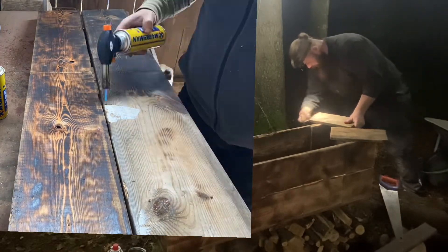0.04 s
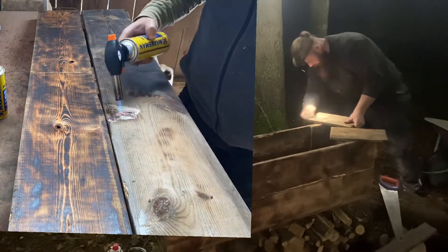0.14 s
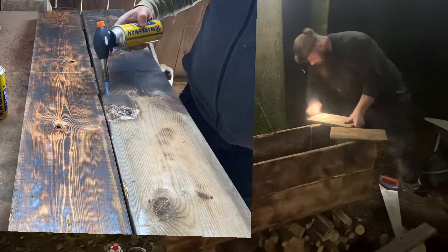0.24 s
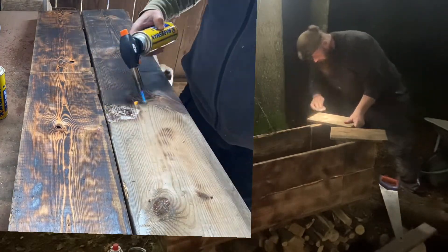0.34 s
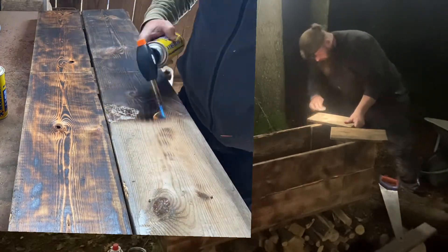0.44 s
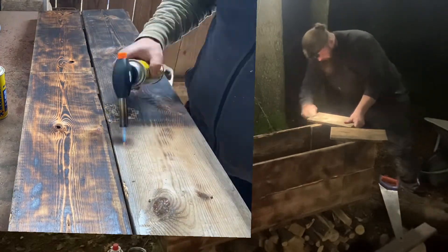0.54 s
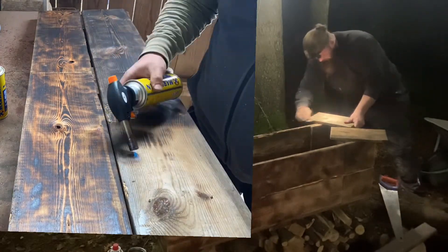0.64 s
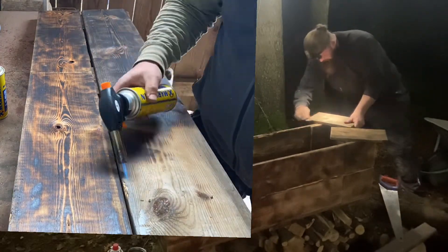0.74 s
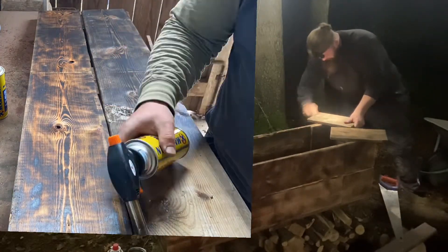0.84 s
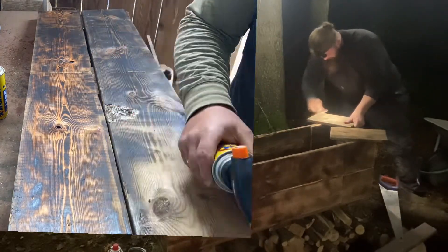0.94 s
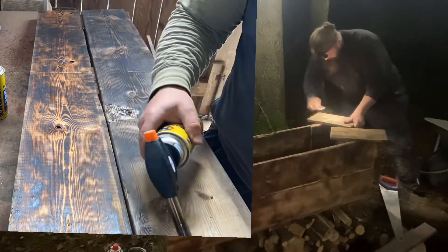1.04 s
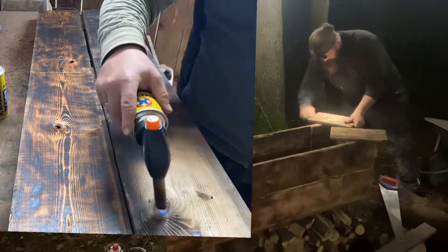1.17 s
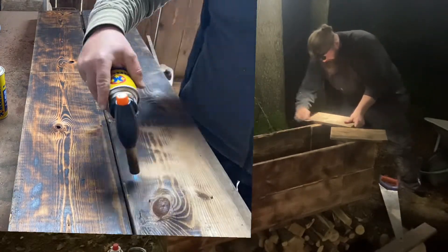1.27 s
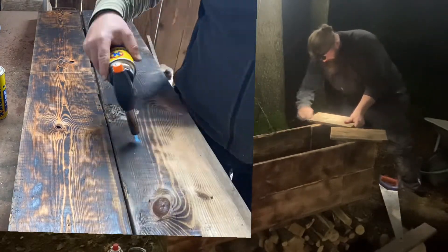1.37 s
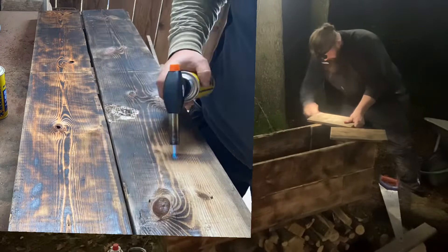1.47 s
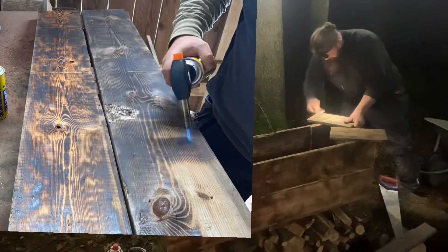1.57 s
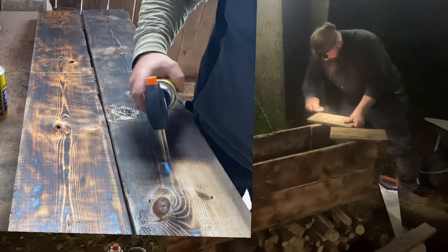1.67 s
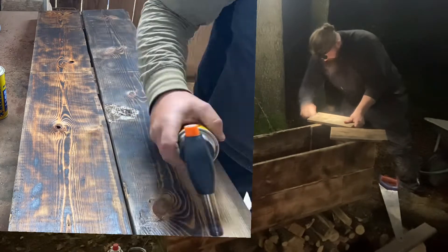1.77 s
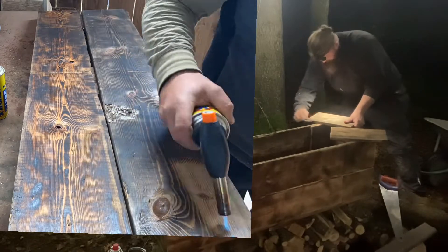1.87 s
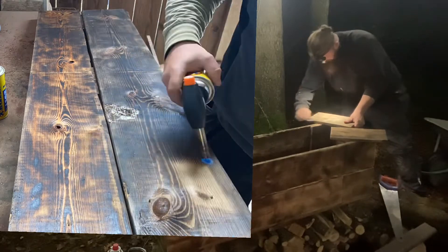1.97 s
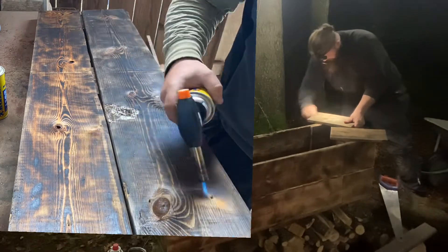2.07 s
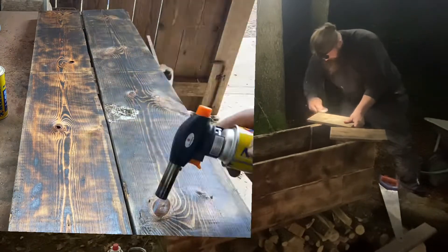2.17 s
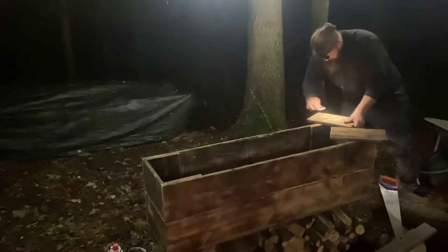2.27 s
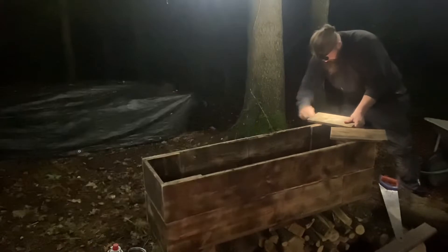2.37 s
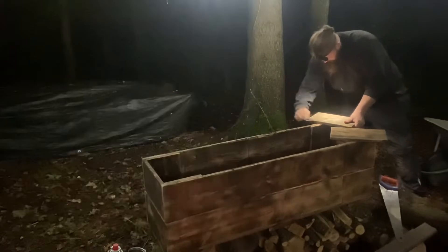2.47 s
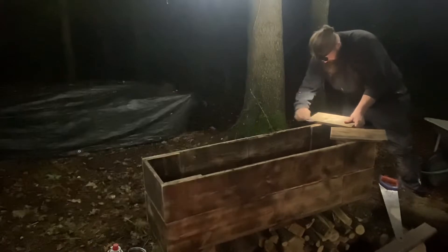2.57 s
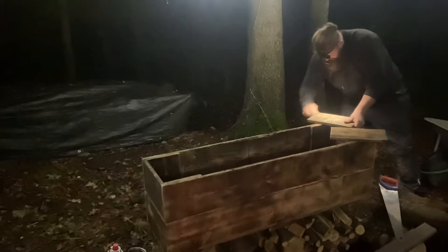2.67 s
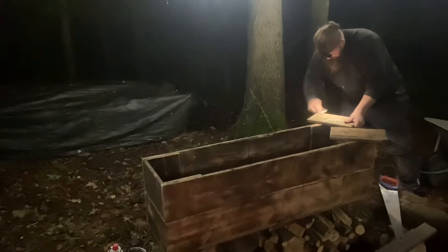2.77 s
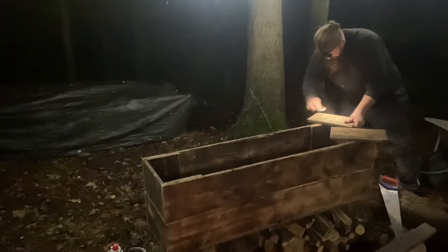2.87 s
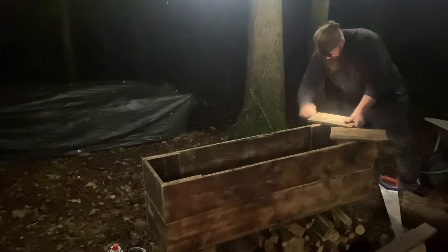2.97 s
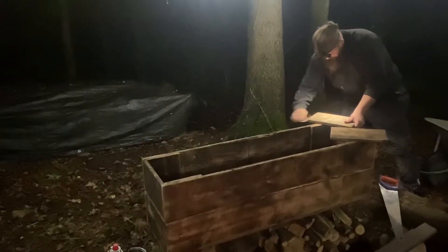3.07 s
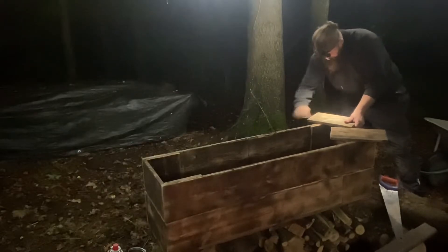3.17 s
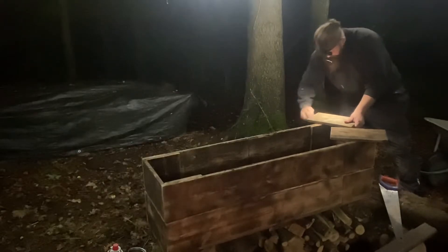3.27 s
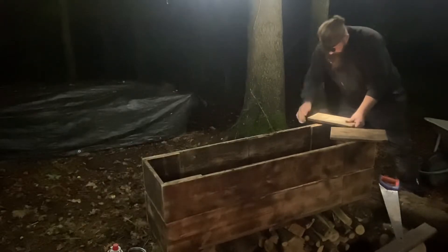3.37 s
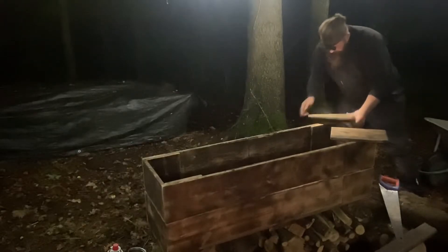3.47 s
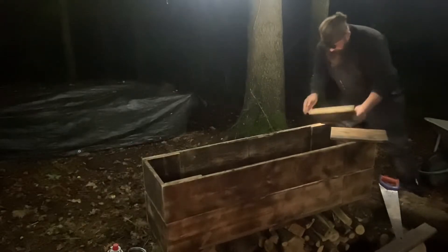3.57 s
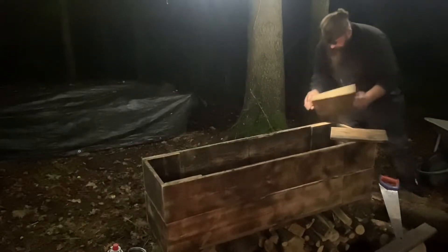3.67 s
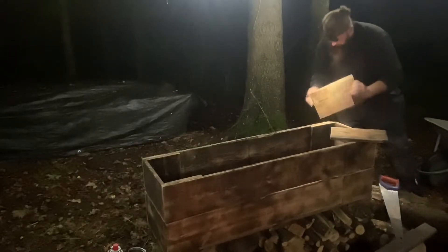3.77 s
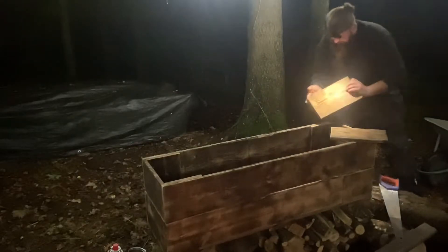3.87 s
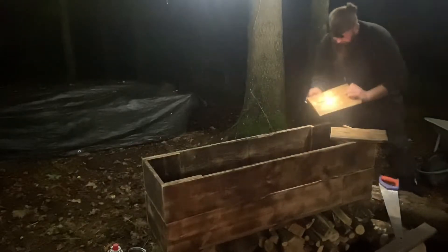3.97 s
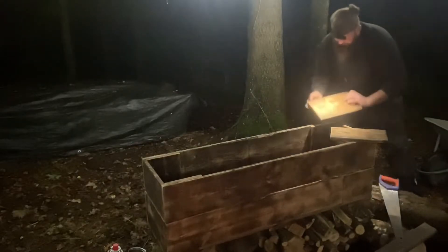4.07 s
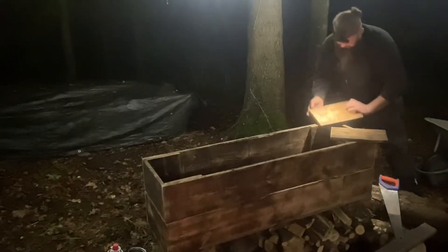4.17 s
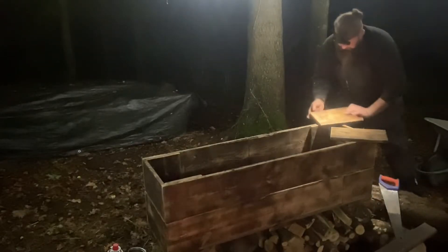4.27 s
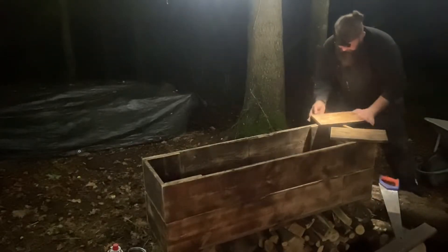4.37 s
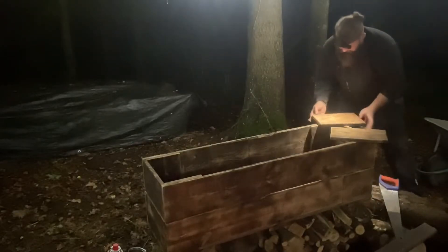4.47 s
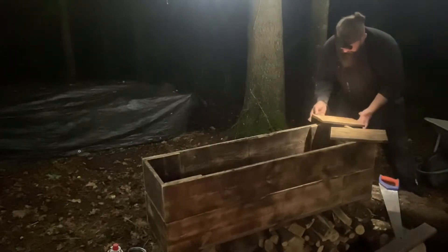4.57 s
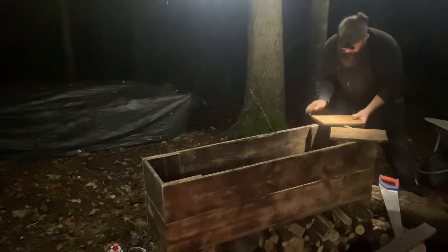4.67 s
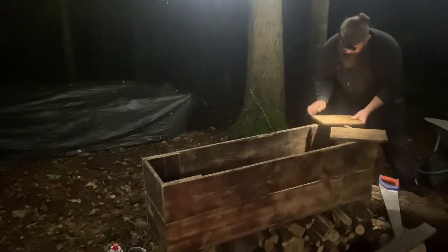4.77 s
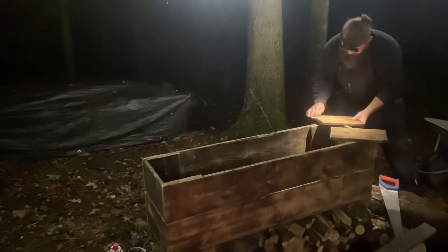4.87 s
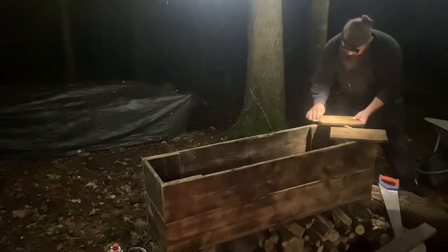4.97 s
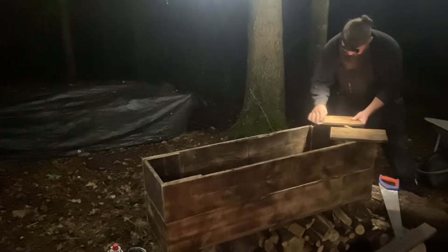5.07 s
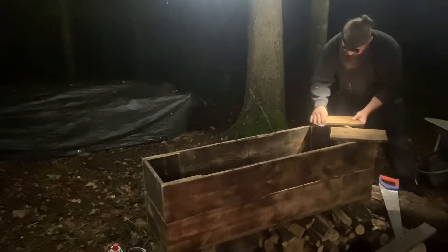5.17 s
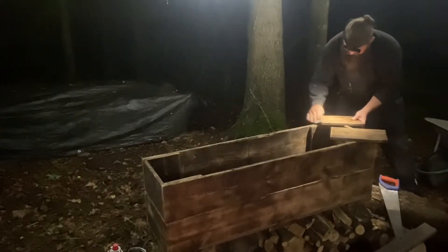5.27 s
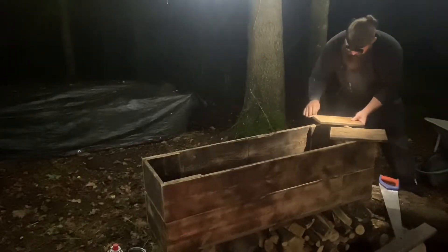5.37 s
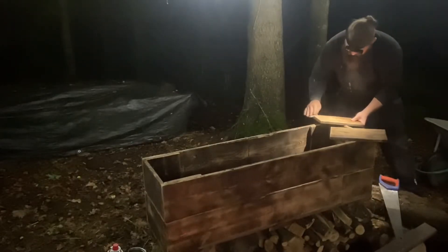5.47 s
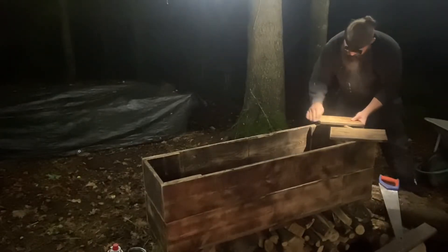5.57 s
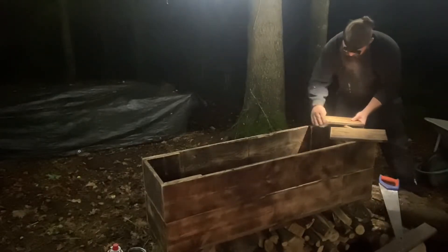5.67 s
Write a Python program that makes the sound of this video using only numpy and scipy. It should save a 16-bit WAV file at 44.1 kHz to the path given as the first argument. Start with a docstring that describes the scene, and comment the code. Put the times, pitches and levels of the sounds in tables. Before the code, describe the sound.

Eleven brisk, gritty sanding strokes on wood, a hollow knocking as the board is repositioned on a crate, then lighter, airier rubbing outdoors.

```python
"""Under faint night air throughout, eleven hard rasping strokes are heard: a board sanded on a wooden crate.
The board is lifted, turned and set down with a hollow clatter; three lighter strokes follow.
Random grain impulses, filtered and shaped by each stroke, make the rasp, drone and fizz; decaying modes
make the clatter, noise bursts the ticks and rustles of the paper.
Trees return a faint scattered echo, and a two-port microphone colours the pair."""
import sys
import numpy as np
from scipy import signal
from scipy.fft import rfft, irfft
from scipy.io import wavfile
from scipy.ndimage import uniform_filter1d

SR = 44100
rng = np.random.default_rng(int(sys.argv[2]) if len(sys.argv) > 2 else 0)


def store_pcm(level_fs):
    """Save levels as 16-bit WAV."""
    pcm = np.round(np.clip(level_fs, -1, 1) * 32767).astype(np.int16)
    wavfile.write(sys.argv[1], SR, np.atleast_2d(pcm).T)


N = 253134
FREQS = np.fft.rfftfreq(N, 1 / SR)
TIME = np.arange(N) / SR

# Night air spectrum, relative: [f/Hz, level/dB]
AIR_SPECTRUM = [(20, -58), (50, 5), (80, 5.5), (170, 0.5), (260, -4.5), (420, -6), (700, -16), (1500, -17),
                (3000, -22.5), (7000, -27), (16000, -32.5)]
AIR_DB = -46
# Echo from the trees: [f/Hz, t60/s, relative level/dB]
WOODS_DECAY = [(100, 0.35, -19), (300, 0.095, 13), (1500, 0.32, -0.5), (4020, 0.42, -5.5), (7750, 0.41, -8),
               (16000, 0.34, -21)]

# Grit and paper edges snap: [t/s, level/dB before the common tick gain]
PAPER_TICKS = [(0.3733, -29.5), (0.4466, -35), (0.6935, -19.5), (0.9323, -23.5), (1.0283, -27.5),
               (3.485, -39.5), (3.9464, -38), (4.1063, -30), (4.2838, -26), (4.325, -20), (4.377, -31),
               (4.4049, -29.5), (4.4755, -20), (4.659, -31.5)]
# Hand and paper slide lightly: [t/s, length/s, level/dB before the common rustle gain, centre f/Hz]
PAPER_RUSTLES = [(0.963, 0.032, -36, 910), (0.984, 0.038, -41.5, 1486), (1.323, 0.045, -40, 1795),
                 (1.646, 0.04, -40.5, 1220), (2.232, 0.069, -45, 1830), (2.883, 0.067, -44, 1320),
                 (3.536, 0.067, -46.5, 1210), (3.791, 0.068, -41, 2080), (3.962, 0.065, -45.5, 1440),
                 (4.002, 0.067, -47.5, 1800), (4.189, 0.097, -52.5, 3430), (4.364, 0.11, -43.5, 2380),
                 (4.574, 0.067, -48, 2040)]
# The lifted board rings when fingers catch it: [t/s, level/dB]
BOARD_TAPS = [(3.685, -50), (3.8, -33.5), (3.918, -46.5)]

# Modes of the board lying on the crate: [f/Hz, level/dB for a hard contact, t60/s when free to ring]
CRATE_MODES = [(56.5, -24, 0.76), (81.1, -14, 0.38), (169.3, -5, 0.38), (179.2, -2, 0.37),
               (212.4, 10, 0.12), (267.7, -1.5, 0.09), (290, -3, 0.14), (355.6, -4.5, 0.16),
               (441.6, -8, 0.18), (470, -2, 0.094), (549.3, -7, 0.16), (581.5, -10, 0.089),
               (644, -15, 0.19), (787, -16.5, 0.13), (957, -20, 0.14), (1046, -4.5, 0.063),
               (1106, -9.5, 0.076), (1202, -6, 0.079), (1430, -14, 0.053)]
# The board bumps the crate: [t/s, level/dB re the crate response, contact corner f/Hz, ring time factor]
CRATE_KNOCKS = [(3.272, -8.5, 750, 0.44), (3.295, -7, 190, 0.3), (4.107, -7.5, 1160, 0.78),
                (4.119, -8.5, 544, 1), (4.133, -18, 223, 0.69), (4.173, -16.5, 1000, 0.46),
                (4.2, -20, 300, 0.77), (4.256, -18, 800, 0.51), (4.279, -17.5, 865, 0.94),
                (4.316, -21, 400, 0.33), (4.427, -13.5, 1080, 1), (4.448, -19, 1290, 1),
                (4.467, -16.5, 1370, 0.93), (4.486, -8.5, 397, 0.74), (4.517, -16, 233, 0.95),
                (4.601, -24.5, 300, 0.7), (4.652, -39, 245, 0.61)]
# The board drags and judders on the crate: [t/s, length/s, level/dB before the common drag gain, sag/dB]
CRATE_DRAGS = [(3.364, 0.094, -35, 1), (4.107, 0.21, -14.5, 7), (4.436, 0.083, -9.5, 6.5),
               (4.625, 0.021, -20, -1), (4.696, 0.083, -35.5, -6)]
DRAG_RISE_S, DRAG_FALL_S = 0.017, 0.0088

# Strokes: [t/s, length/s, rise/s, release time constant/s, rasp level/dB, rasp sag over the stroke/dB,
#           drone level/dB, hollow upper drone re drone/dB, fizz re rasp/dB], before the gains of sanding()
HARD_STROKE_TABLE = [ (0.052, 0.21, 0.024, 0.0086, -22.8, -0.5, -30.5, 2, -11),
                     (0.472, 0.14, .016, 0.013, -22, -1.5, -28.5, 2.5, -11.5),
                     (0.750, 0.15, .024, 0.0076, -22, 3, -29, -3.5, -8),
                     (1.100, 0.11, 0.017, 0.0077, -23, 3, -30.5, -3.5, -9.5),
                     (1.347, 0.16, 0.017, .008, -23, 0, -25, -5.5, -7.5),
                     (1.716, 0.11, 0.015, 0.011, -24.5, 3.5, -30.5, -4.5, -7.5),
                     (1.954, 0.16, 0.018, .008, -21.5, 1, -31.5, 0.5, -6.5),
                     (2.314, .100, 0.025, .014, -22, 1.5, -26, -8, -8),
                     (2.552, 0.17, 0.013, 0.0062, -21, 5, -28.5, 6, -8.5),
                     (2.923, 0.098, 0.02, 0.016, -23, 0, -30.5, 6, -6),
                     (3.199, 0.076, 0.0032, 0.0073, -25, 1, -26, -5.5, -8), ]
LIGHT_STROKE_TABLE = [ (4.766, 0.29, 0.1, 0.025, -27.5, -2.5, -39, -13, -8.5),
                      (5.139, 0.19, 0.055, 0.027, -26, -1.5, -32, 0, -3),
                      (5.420, 0.18, 0.072, 0.035, -27, -4, -38.5, 5, -4), ]
# Grit digs in and the rasp surges: [t/s, half width to 1/e/s, peak rasp gain/dB, peak fizz gain/dB]
GRIT_CATCHES = [(.119, 0.012, 5.5, 2), (.488, 0.011, 2.5, 5), (1.122, .009, 0, 0.5),
                (1.365, 0.013, 3.5, 1.5), (1.808, 0.013, 5.5, 1), (1.968, 0.0079, 6, 1.5),
                (2.05, .012, 1.5, 4), (2.564, 0.011, 6, 7.5), (3.009, .009, 3.5, 4),
                (3.261, .016, 9.5, 3.5)]
# Relative spectra of the grit cutting wood, rasp and fizz: [f/Hz, level/dB]
HARD_RASP_SPECTRUM = [(150, -18), (350, -37), (600, -22), (760, -6.5), (1020, -5.5), (1300, -4),
                      (1500, -1.5), (1780, -0.5), (2150, -4), (3200, -4), (4300, -9), (5600, -15.5),
                      (8000, -20.5), (16000, -41.5)]
LIGHT_RASP_SPECTRUM = [(200, -32), (600, -12), (850, -4.5), (1150, 1.5), (1400, -2.5), (1750, 2),
                       (2200, -0.5), (3300, -2), (4300, -15.5), (5600, -14), (8000, -11.5), (16000, -27.5)]
HARD_FIZZ_SPECTRUM = [(1500, -50), (4000, -9), (6400, 0), (8000, 3), (12000, -4.5), (16000, 0.5)]
LIGHT_FIZZ_SPECTRUM = [(1500, -14.5), (4000, 5.5), (6400, -4.5), (8000, -5.5), (12000, -19.5), (16000, -13)]
# Chatter of the paper as a stroke starts, relative spectrum: [f/Hz, level/dB]
BITE_SPECTRUM = [(700, -78), (1200, -31), (1450, -5), (1650, 7.5), (2000, -4), (4000, 2.5), (8000, -40)]
# Dull body of the board under the rubbing hand, relative spectrum: [f/Hz, level/dB]
BODY_SPECTRUM = [(100, -16.5), (170, -7), (230, -4.5), (330, 0.5), (450, -0.5), (570, -4), (720, -19),
                 (1200, -34.5)]
# Bending modes of the board: [f/Hz, width/Hz, lift/dB before summing and the ceiling]
BOARD_MODES = [(1052, 18, 7.5), (1229, 39, 8), (1774, 53, 5.5), (2170, 52, -1), (2410, 31, -5.5),
               (2560, 26, 0), (2624, 12, -4), (3090, 44, 1.5), (4270, 55, 12.5)]
FIZZ_SAG_DB = 2  # extra fall of the fizz over a stroke as dust fills the grit
DRONE_ENDS_DB, DRONE_SKEW = -5, 0.62  # the drone follows the hand's speed: one arch, leaning early
HOLLOW_HZ = 456  # the hollow part of the drone lies above this

# Microphone pair: [f/Hz, left-right likeness/0-1, left lead/half turns]
PORT_PAIR = [(150, .99, 0), (600, .86, 0), (4200, .88, 0), (5200, .25, -.5), (5900, .5, -.1),
             (6500, .98, 0), (7500, .99, 0), (8000, .55, -.5), (8500, .98, -1), (9500, .99, -1),
             (10050, .5, -1.5), (10600, .99, -2), (11600, .99, -2), (12300, .5, -2.6), (12900, .98, -3),
             (13800, .98, -3), (14200, .3, -3.5), (14700, .99, -4)]
# Port balance: [f/Hz, left minus right level/dB]
PORT_BALANCE = [(120, 0.6), (280, 0), (550, -3.5), (1000, -1), (2000, 0.6), (4400, 5), (6000, 3.5),
                (7200, 5), (16000, 0)]
# Colour of the microphones: [f/Hz, level/dB]
MIC_COLOUR = [(4200, -1), (5200, -4), (5900, -4.5), (6500, 2), (8500, -3.5), (9600, 1.5), (10700, -1),
              (12300, 5.5), (13700, -1), (14700, 0), (15800, -4.5)]
EDGE_HZ = 15900  # upper band limit


def amp(db):
    """Decibel law: level in dB to amplitude gain."""
    return 10 ** (np.asarray(db) / 20)


def unit(x):
    """Normalisation: scales to rms 1."""
    return x / np.sqrt(np.mean(x ** 2) + 1e-20)


def read(table, hz, axis=1):
    """Interpolation: joins one table column by lines on a log-frequency axis."""
    columns = np.transpose(table)
    return np.interp(np.log(hz + 1), np.log(columns[0] + 1), columns[axis])


def add(mix, s, sound):
    """Superposition: adds a sound to the mix at time s."""
    part = mix[max(round(s * SR), 0):][:len(sound)]
    part += sound[:len(part)]


def colour(x, spectrum):
    """Linear filtering: weights x by a spectrum, then scales to rms 1."""
    return unit(irfft(rfft(x) * amp(read(spectrum, FREQS)), N))


def band_noise(size, lo_hz, hi_hz):
    """Band-limited noise: soft band edges, rms 1."""
    sos = signal.butter(2, [lo_hz, min(hi_hz, SR / 2 - 1000)], "band", fs=SR, output="sos")
    return unit(signal.sosfilt(sos, rng.standard_normal(size)))


def wander(rate_hz):
    """Slow random modulation: low-passed noise, rms 1."""
    return unit(irfft(rfft(rng.standard_normal(N)) / (1 + (FREQS / rate_hz) ** 4), N))


def night_air(apart_db=-12):
    """Partly coherent noise: a low, faintly swelling wash of distant noise, mostly shared by both ports."""
    shared = colour(rng.standard_normal(N), AIR_SPECTRUM)
    apart = colour(rng.standard_normal(N), AIR_SPECTRUM)
    swell_db = 1.2 * wander(8)
    return amp(AIR_DB + swell_db) * (shared + amp(apart_db) * np.array([apart, -apart]))


def woods(x, wet_db):
    """Multiple scattering: sparse echoes from trunks and ground, each band with its own decay time."""
    echoes = rng.choice([-1., 1.], (2, SR)) * (rng.random((2, SR)) < 2500 / SR)
    echoes = echoes * (TIME[:SR] > .012)  # nothing returns in the first 12 ms
    hz, t, bands = signal.stft(echoes, SR, nperseg=256)
    t60 = read(WOODS_DECAY, hz)[:, None]
    fade_db = read(WOODS_DECAY, hz, axis=2)[:, None] - 60 * t / t60
    tail = signal.istft(bands * amp(fade_db), SR, nperseg=256)[1]
    tail = tail / np.linalg.norm(tail[0])
    return amp(wet_db) * signal.fftconvolve(x[None], tail, axes=1)[:, :N]


def board(x, ceiling_db=4.5):
    """Resonance: bending modes shape x gently; the pressing hand keeps them weak."""
    lift_db = sum(db / (1 + (2 * (FREQS - hz) / width) ** 2) for hz, width, db in BOARD_MODES)
    return irfft(rfft(x) * amp(np.minimum(lift_db, ceiling_db)), N)


def paper(tick_db=-3, tick_s=0.00096, rustle_db=2, scuff_db=4.0, soft_s=0.0074):
    """Impulsive and frictional noise: sharp ticks, and soft uneven scuffs as the hand shifts its grip."""
    ticks, scuffs, t = np.zeros(N), np.zeros(N), TIME[:SR // 5]
    for s, db in PAPER_TICKS:
        snap = band_noise(len(t), 4100, 16400) * np.exp(-t / tick_s)
        add(ticks, s, amp(db + tick_db) * snap)
    for s, length, db, hz in PAPER_RUSTLES:
        octave = band_noise(len(t), hz / np.sqrt(2), hz * np.sqrt(2))
        fade = np.clip(1 - t / length, 0, 1) * (1 - np.exp(-t / soft_s))
        add(scuffs, s, amp(db + rustle_db) * octave * fade)
    unevenness = unit(amp(scuff_db * wander(150)))
    return ticks + board(scuffs) * unevenness


def taps(ring_hz=1030, partner_hz=1066, partner_db=-7, t60=0.22):
    """Free vibration and beating: held in the air, the board rings with a close pair of bending modes."""
    out, t = np.zeros(N), TIME[:SR // 2]
    pair = np.sin(2 * np.pi * ring_hz * t) + amp(partner_db) * np.sin(2 * np.pi * partner_hz * t)
    for s, db in BOARD_TAPS:
        add(out, s, amp(db - 60 * t / t60) * pair)
    return out


def crate(corner_hz, ring=1, thud_db=-17, thud_s=0.012, build_s=0.012):
    """Modal impulse response: clear modes over a dense thud; soft contacts reach only the low modes."""
    t = TIME[:SR // 2]
    thud = band_noise(len(t), 246, max(1.76 * corner_hz, 340))
    out = thud * amp(thud_db) * np.exp(-t / thud_s)
    for hz, db, t60 in CRATE_MODES:
        build = 1 - np.exp(-t * hz / (200 * build_s))  # build_s holds at 200 Hz; low modes take longer
        contact = 1 / np.hypot(1, (hz / corner_hz) ** 2)
        decay = amp(db - 60 * t / (t60 * ring))
        out += decay * build * contact * np.sin(2 * np.pi * hz * t)
    return out


def shake(force, corner_hz):
    """Convolution: the crate drones as a rubbing force drives its impulse response."""
    response = crate(corner_hz)
    return signal.oaconvolve(force, response / np.linalg.norm(response))[:N]


def grit(per_s, spread_db):
    """Shot noise: single grains tear fibres as random clicks, many small, a few large."""
    size = amp(spread_db * np.minimum(rng.exponential(1, N), 4))
    struck = rng.random(N) < per_s / SR
    return unit(size * rng.choice([-1, 1], N) * struck)


def rub(start, length, rise_s, fall_s, sag_db, grip=0):
    """Friction envelope: a share grips at once, the rest builds; it sags and dies as the hand stops."""
    t = TIME - start
    hold = (t >= 0) * np.clip(grip + (1 - grip) * t / rise_s, 0, 1)
    sag = amp(sag_db * (.5 - np.clip(t / length, 0, 1)))
    return hold * sag * np.exp(-np.maximum(t - length, 0) / fall_s)


def clatter(drag_db=-4, drag_corner_hz=330):
    """Impact and friction excitation: the board rocks and drags to rest on the crate."""
    drag = sum(amp(db) * rub(s, length, DRAG_RISE_S, DRAG_FALL_S, sag_db)
               for s, length, db, sag_db in CRATE_DRAGS)
    out = shake(amp(drag_db) * drag * grit(900, spread_db=0.5), drag_corner_hz)
    for s, db, corner_hz, ring in CRATE_KNOCKS:
        add(out, s, amp(db) * crate(corner_hz, ring))
    return out


def travel(x, patchy_db):
    """Moving-point excitation: the hand drives some board modes and damps others, in passing bright patches."""
    z = signal.stft(x, SR, nperseg=1024, noverlap=768)[2]
    patches = rng.standard_normal(z.shape[::-1]).T
    for _ in range(2):
        patches = uniform_filter1d(patches, size=4, axis=0)  # over frequency
        patches = uniform_filter1d(patches, size=8, axis=1)  # over time
    return signal.istft(z * amp(patchy_db * unit(patches)), SR, nperseg=1024, noverlap=768)[1][:N]


def effort(strokes, grip, fizz_grip, bite_s):
    """Amplitude modulation: stroke levels of rasp, drone, its hollow part, fizz and opening chatter."""
    rasp, drone, hollow, fizz, fresh = np.zeros((5, N))
    for start, length, rise_s, fall_s, rasp_db, sag_db, drone_db, hollow_db, fizz_db in strokes:
        way = np.clip((TIME - start) / (length + fall_s), 0, 1)
        speed = np.sin(np.pi * way ** DRONE_SKEW)
        push = amp(drone_db + DRONE_ENDS_DB * (1 - speed)) * rub(start, length + fall_s, rise_s, fall_s, 0)
        drone += push
        hollow += amp(hollow_db) * push
        rasp += amp(rasp_db) * rub(start, length, rise_s, fall_s, sag_db, grip)
        fizz += amp(rasp_db + fizz_db) * rub(start, length, rise_s, fall_s, sag_db + FIZZ_SAG_DB, fizz_grip)
        add(fresh, start, np.exp(-TIME / bite_s))
    for s, width, rasp_db, fizz_db in GRIT_CATCHES:
        surge = np.exp(-((TIME - s) / width) ** 2)
        rasp = rasp * amp(rasp_db * surge)
        fizz = fizz * amp(fizz_db * surge)
    return rasp, drone, hollow, fizz, fresh


def ports(direct, scattered):
    """Coherence: mixes two unrelated noises into a pair as alike as the microphone ports hear it."""
    likeness = read(PORT_PAIR, FREQS)
    shared = np.sqrt((1 + likeness) / 2) * rfft(direct)
    apart = np.sqrt((1 - likeness) / 2) * rfft(scattered)
    return irfft(np.array([shared + apart, shared - apart]), N)


def sanding(strokes, rasp, fizz, grip, fizz_grip, fizz_db, ring_db, body_db, bite_db, corner_hz,
            judder_db, spread_db, patchy_db, bite_s=0.021):
    """Frictional excitation: grains catch in clumps, rasp in the board, shake the crate and fizz."""
    rasp_level, drone_level, hollow_level, fizz_level, fresh = effort(strokes, grip, fizz_grip, bite_s)
    clumps, sides = amp(judder_db * wander(200)), []
    for _ in range(2):
        grains = unit(travel(grit(14000, spread_db) * clumps, patchy_db))
        # while the hand is still slow the paper chatters in a narrow band
        chatter = amp(bite_db) * fresh * colour(grains, BITE_SPECTRUM)
        scrape = colour(board(grains), rasp) + chatter
        body = colour(grains, BODY_SPECTRUM)
        deep = irfft(rfft(body) / (1 + (FREQS / HOLLOW_HZ) ** 8), N)
        push = drone_level * deep + hollow_level * (body - deep)
        drone = amp(body_db) * push + amp(ring_db) * shake(push, corner_hz)
        hiss = amp(fizz_db) * fizz_level * colour(grains, fizz)
        sides.append(rasp_level * scrape + drone + hiss)
    return ports(*sides)


def scene():
    """Superposition: all the work happens at one spot on the crate, amid night air and echo."""
    hard = sanding(HARD_STROKE_TABLE, HARD_RASP_SPECTRUM, HARD_FIZZ_SPECTRUM, grip=0.12, fizz_grip=0.31,
                   fizz_db=5.5, ring_db=-14.5, body_db=-2.5, bite_db=-5.5, corner_hz=764,
                   judder_db=0.48, spread_db=2.5, patchy_db=3.5)
    light = sanding(LIGHT_STROKE_TABLE, LIGHT_RASP_SPECTRUM, LIGHT_FIZZ_SPECTRUM, grip=0.15, fizz_grip=0.067,
                    fizz_db=2.0, ring_db=-7.5, body_db=-19, bite_db=-29, corner_hz=275,
                    judder_db=-0.5, spread_db=1.0, patchy_db=3.5)
    work = hard + light + clatter() + taps() + paper()
    return work + night_air() + woods(work.mean(0), wet_db=-20.5)


def record(dry):
    """Transfer function: the ports colour the sound and turn the treble's phase apart; a low-pass follows."""
    side = np.array([[.5], [-.5]])
    response = amp(read(MIC_COLOUR, FREQS) + side * read(PORT_BALANCE, FREQS)).astype(complex)
    response[1] *= np.exp(-1j * np.pi * read(PORT_PAIR, FREQS, axis=2))
    heard = irfft(rfft(dry) * response, N)
    low_pass = signal.firwin(511, EDGE_HZ, window=("kaiser", 9), fs=SR)
    return signal.oaconvolve(heard, low_pass[None], "same")


dry = scene()
out = record(dry)
store_pcm(out)
```